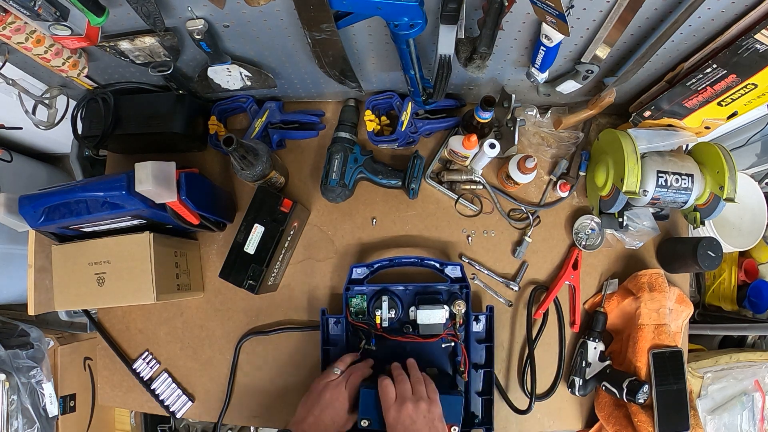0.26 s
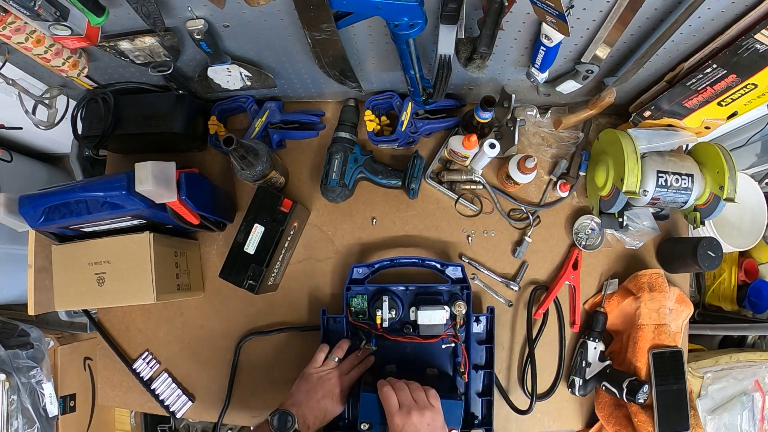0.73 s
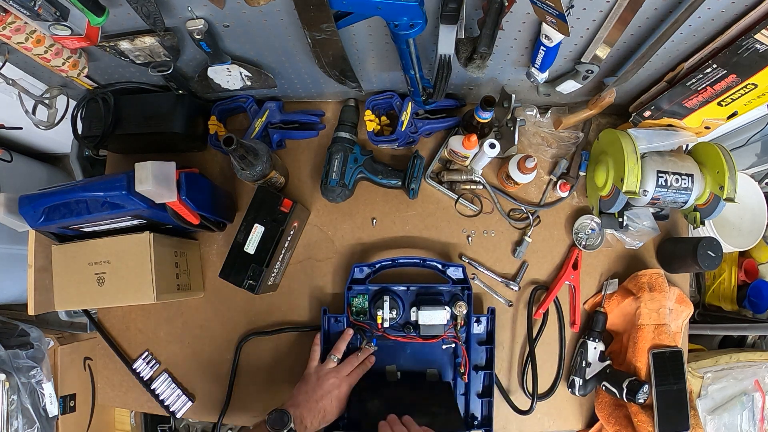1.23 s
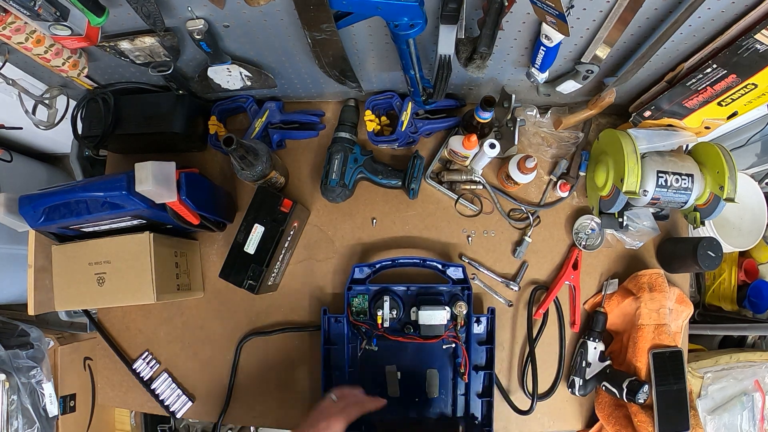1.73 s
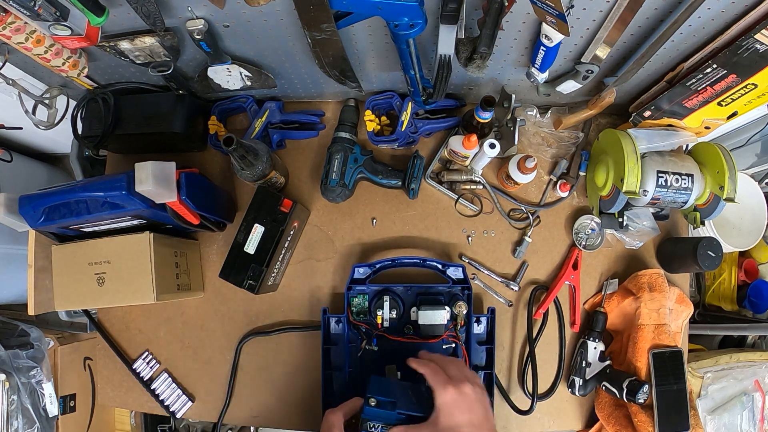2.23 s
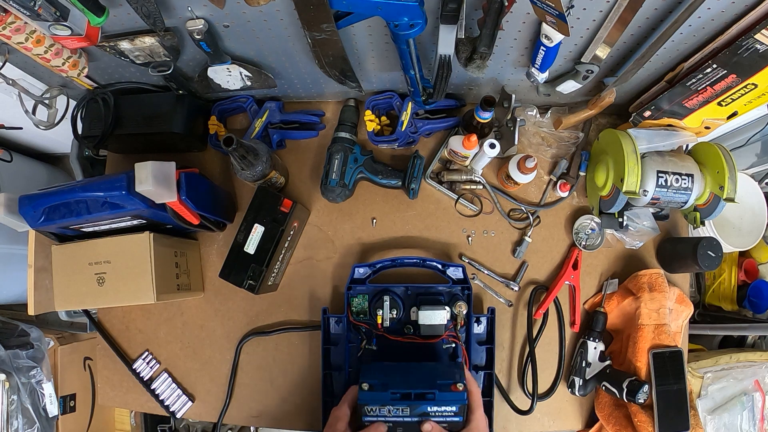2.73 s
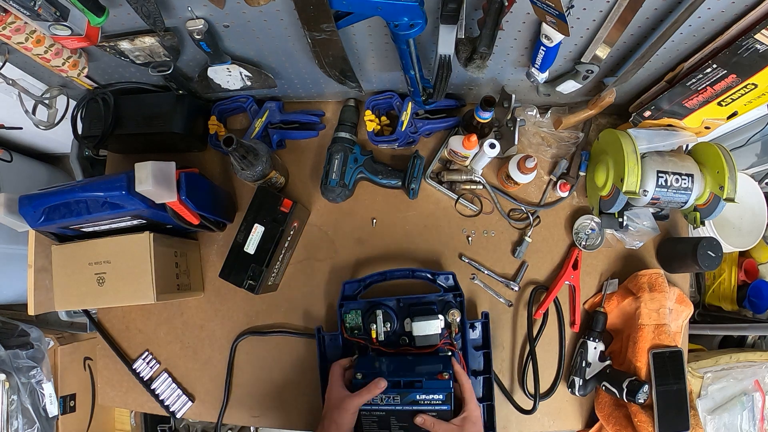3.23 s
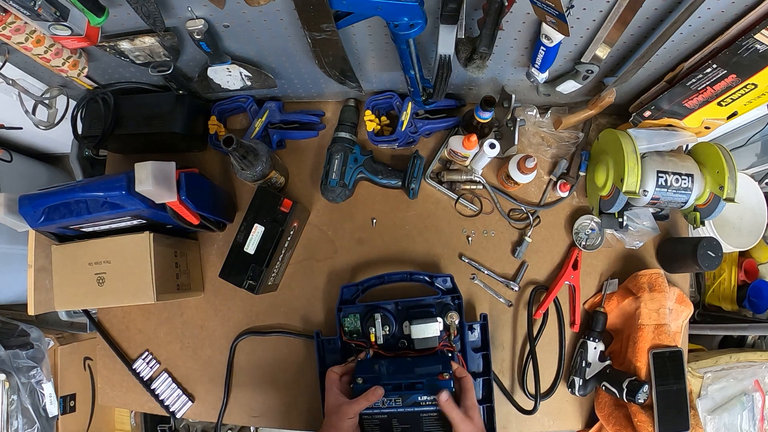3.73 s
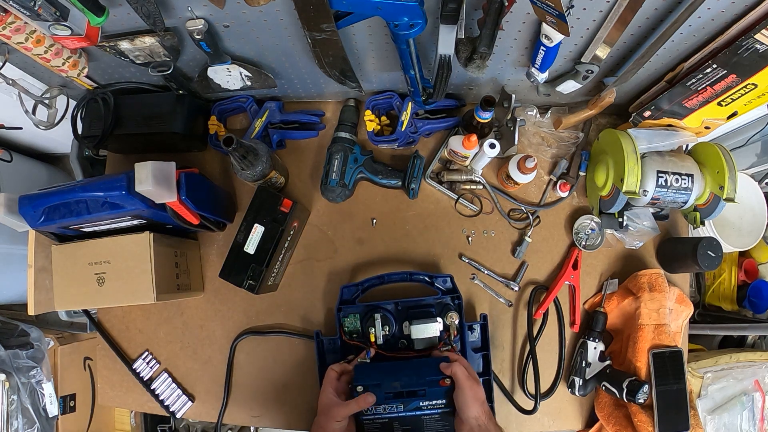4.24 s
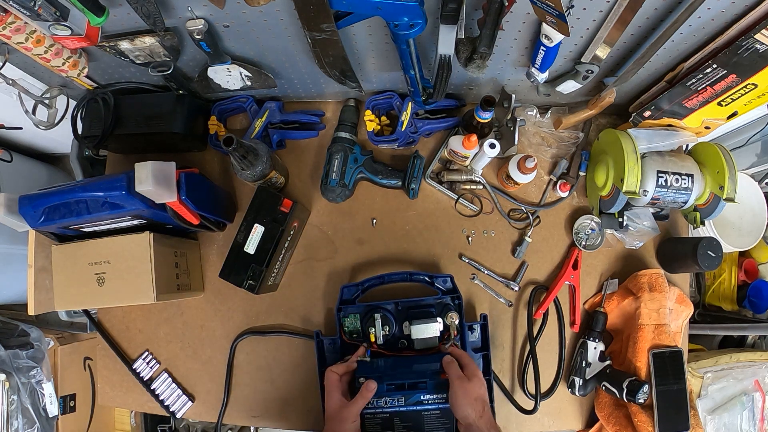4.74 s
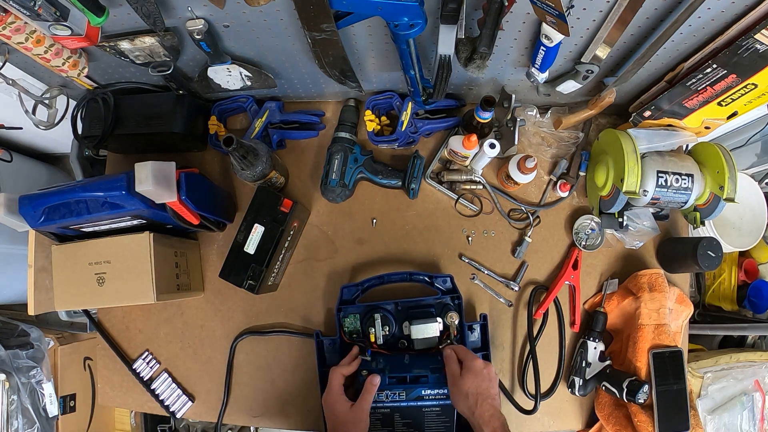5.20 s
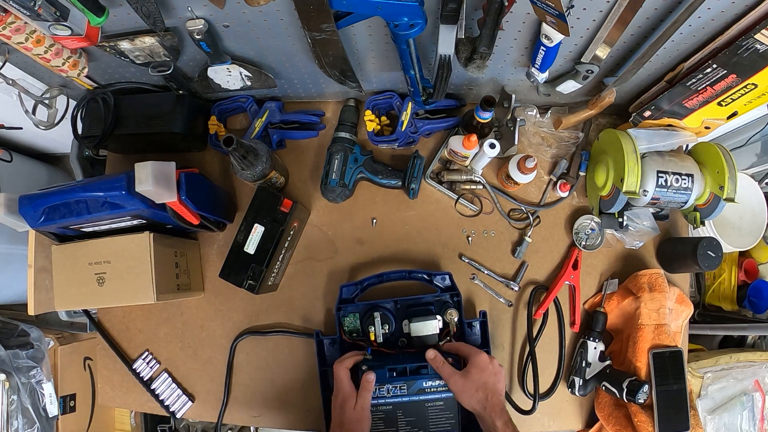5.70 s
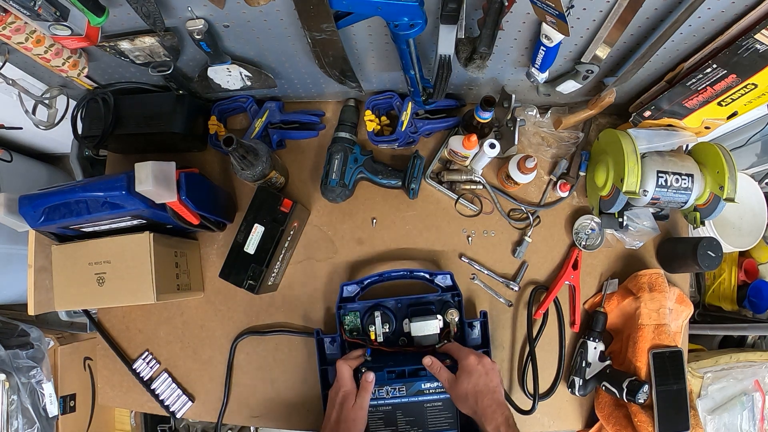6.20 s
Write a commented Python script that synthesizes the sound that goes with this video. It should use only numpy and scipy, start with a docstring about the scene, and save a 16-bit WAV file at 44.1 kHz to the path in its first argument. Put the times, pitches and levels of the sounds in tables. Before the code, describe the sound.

Close plastic handling on a garage workbench: a short scrape, one loud hard clack, a duller double thunk later, then light clicks and scuffs.

```python
"""Hands take a small battery out of a hollow plastic case on a garage workbench, drop it back and push it home.
Its edge scrapes early on; it strikes the case hard just before 1 s and again around 3 s, more softly near 6 s.
Each contact is a burst of noise plus ringing shell tones, and thumps are low swinging tones of the bench.
Throughout, fingers click, rub and slide (filtered noise and tiny slips) over still air, and the garage
answers briefly with fading noise."""
import sys
import numpy as np
from scipy import signal
from scipy.fft import rfft, irfft, next_fast_len
from scipy.io import wavfile
from scipy.ndimage import map_coordinates

SR = 44100
rng = np.random.default_rng(int(sys.argv[2]) if len(sys.argv) > 2 else 0)


def master(y):
    """Save y as 16-bit WAV."""
    cut = np.clip(np.atleast_2d(y).T, -1, 1)
    pcm = np.round(cut * 32767)  # scale
    wavfile.write(sys.argv[1], SR, pcm.astype(np.int16))


N = 284886  # length in samples

# Tone colour of rubbing on the case, for long slides and short strokes: f/Hz, gain/dB
RUB_COLOUR = [(180, -37), (300, 4), (446, -10.5), (581, -4.5), (835, -4.5), (1030, -2), (1540, -5),
              (1730, -2), (1910, -4.5), (2400, -5.5), (3400, -8.5), (5050, -17), (6360, -22.5),
              (9140, -24.5), (15500, -59.5)]


def contacts():
    """Each contact cracks, scatters off the clutter and rings the shell; harder ones sound brighter."""
    # The battery strikes the case: t/s, level/dB, hardness/(dB per octave), extra knock of the hollow/dB,
    # f of the struck wall/Hz, time to fall 60 dB/s
    blow_events = [(0.053, -55.5, -7, 1, 1010, 0.092), (0.651, -46.5, -0.2, 1.5, 1710, 0.12),
                   (0.932, -15, 0.83, 3, 2620, 0.018), (0.952, -22, 0, 4, 3610, 0.015),
                   (0.9643, -22.5, 1, 4.5, 2728, 0.014), (1.078, -46, -2, -2, 2600, .081),
                   (2.089, -60, -0.5, 15.5, 486.6, 0.053), (2.982, -33.5, -6, -2.5, 1606, 0.048),
                   (3.026, -39.5, -3.5, 6.5, 1170, 0.069), (3.056, -43, -7, -9, 1710, 0.062),
                   (3.262, -32.5, -3.5, 2.5, 1250, 0.21), (3.2769, -24, -5.8, -6, 570, 0.029),
                   (3.2806, -27.5, -4.5, -17, 595, 0.082), (3.292, -34, -5, -6.5, 454, 0.18),
                   (3.31, -35, -6.5, -6, 754, 0.072), (4.2369, -43, -4, 3.5, 2070, 0.084),
                   (4.538, -60.5, -9.5, -10.5, 1040, 0.21), (4.84, -40.5, 5.5, -10, 3198, 0.023),
                   (5.267, -49, -4.5, -1, 1750, 0.042), (5.3756, -33, 2.5, 0.5, 3900, 0.082),
                   (5.9198, -46, -4.5, -2.5, 1100, 0.039), (5.964, -34, -2.5, -6, 544, 0.038),
                   (6.4129, -33.5, -5, -3, 1490, 0.043)]
    # Fingers and catches click on the shell: t/s, level/dB, hardness/(dB per octave), f of the wall/Hz
    click_events = [(0.078, -65.5, 6, 4260), (0.148, -49.5, 0, 2440), (0.161, -47, 0, 1730),
                    (0.175, -49.5, 1.5, 2360), (0.772, -57, -0.75, 4440), (1.628, -70.5, 3.5, 3684),
                    (1.678, -72.5, 3.5, 1643), (1.895, -82, 6.5, 8000), (1.968, -72.5, 3.5, 2634),
                    (2.167, -63, 2.5, 4680), (2.246, -54.5, 2.7, 2080), (2.677, -63.5, -2, 802),
                    (2.897, -73.5, 6.5, 3000), (2.955, -58, -4, 3730), (3.474, -43, 0.9, 3170),
                    (3.5308, -43, 0.7, 2590), (3.573, -59.5, 4.5, 3070), (3.598, -45, 1, 3120),
                    (3.615, -49.5, 0, 1970), (3.726, -54, 2, 2340), (3.881, -57.5, -1.5, 2750),
                    (3.914, -54, -4.5, 1690), (3.961, -59, 0, 3260), (4.002, -65, -10.5, 2520),
                    (4.123, -57, -1, 3000), (4.204, -52.5, -3.5, 1080), (4.228, -47.5, -3.3, 1060),
                    (4.362, -66, 4, 2970), (4.434, -55, 1.5, 2780), (4.507, -58, -6.5, 1025),
                    (4.739, -49, -1.5, 2740), (4.879, -46.5, -1, 1075), (4.954, -59, -0.5, 2570),
                    (5.111, -57.5, -4, 963), (5.153, -52, 0.3, 1190), (5.366, -43.5, 4, 4100),
                    (5.586, -65.5, 5.5, 4530), (5.685, -58.5, -0.5, 660), (5.771, -53, -4.5, 1170),
                    (5.893, -49.5, -1.5, 4630), (6.045, -51, -0.9, 1200), (6.107, -55.5, .5, 1210),
                    (6.147, -57.5, -1.5, 1170)]
    # Tones of the hollow case: f/Hz, relative level/dB, time to fall 60 dB/s
    shell_modes = [(149, 1, 0.18), (216, -0.5, 0.27), (237.2, 1.5, 0.27), (280, -9, 0.049), (354, -5, 0.21),
                   (472, -10.5, 0.29), (581.4, 0, 0.22), (788, -4.5, 0.19), (930, -7, 0.081),
                   (950, -8, 0.2), (1207, -4, 0.12), (1430, -15, 0.021), (1487, -7.5, 0.26),
                   (1770, -4.5, 0.12), (2010, -8.5, 0.058), (2580, -9, .08), (2700, -6, 0.077),
                   (3010, -2.5, 0.052), (3240, -4.5, 0.21), (3470, -7, 0.048), (4330, -12, 0.15),
                   (7060, -19.5, 0.14)]
    # Tone colour of the bare contact: f/Hz, gain/dB
    crack_colour = [(71, -27), (120, -0.5), (240, -3), (469, -14.5), (936, -7), (1060, -16), (1190, -12),
                    (2290, -13.5), (2700, -13.5), (3240, -16), (3580, -19), (4570, -19), (6080, -27),
                    (7160, -27.5), (15500, -67.5)]
    # Knock, clack, click, snap and sizzle: low f/Hz, high f/Hz, time over which its level is set/s
    registers = [(120, 400, .02), (400, 1400, .008), (1400, 4000, .008), (4000, 8500, .008),
                 (8500, 15000, .008)]
    # Level of each of these registers at hardness 0, relative to the contact's level: level/dB
    register_levels = np.array([-7.5, -1, 2.5, -5.5, -20.5])
    pivot_hz = 1330  # hardness tilts the registers about this pitch
    click_knock_db, click_t60 = -5.5, 0.055  # a light click hardly stirs the hollow; its length in s
    ring_db, ring_t60 = -8, 0.04  # ring over the crack for a contact this long in s; briefer ones ring less
    wall_db, wall_q = -2, 7  # struck wall over the crack, and sharpness of its resonance

    t = np.arange(SR // 2) / SR
    onset = slice(round(0.008 * SR))
    clicks = [(s, db, hardness, click_knock_db, wall_hz, click_t60)
              for s, db, hardness, wall_hz in click_events]
    events = list(blow_events) + clicks
    octaves = np.array([np.log2(np.sqrt(lo * hi) / pivot_hz) for lo, hi, _ in registers])
    out = np.zeros((2, N))
    for (s, level_db, hardness, knock_db, wall_hz, t60), tail in zip(events, tails(len(events))):
        direct = amp(-60 * t / t60)
        clutter = amp(-28.5 - 60 * t / 0.15)
        fade = (direct + clutter) * (1 - np.exp(-t / 0.0004))
        crack = colour(fade * rng.standard_normal((2, len(t))), crack_colour)

        # every shell tone gets a random sign and strength
        shape = (2, len(shell_modes))
        strengths = rng.choice([-1, 1], shape) * amp(rng.normal(0, 4.4, shape))
        shell = ring(shell_modes, t, strengths)
        wall = resonate(crack, wall_hz, q=wall_q)

        shell_gain = amp(ring_db) * np.sqrt(t60 / ring_t60)
        blow = crack / np.std(crack[0, onset])
        blow += shell_gain * shell / np.std(shell[0, onset])
        blow += amp(wall_db) * wall / np.std(wall[0, onset])
        blow = in_room(blow, tail, wet_db=-12)

        levels = level_db + register_levels + hardness * octaves
        levels[0] += knock_db
        for (lo, hi, build), db in zip(registers, levels):
            part = band(blow, (lo, hi))
            early = np.std(part[:, :round(build * SR)], axis=1, keepdims=True)
            add(out, s, amp(db) * part / early)
    return out


def thumps():
    """The bench top takes the weight softly and swings in its lowest modes."""
    # Weight on the bench: t/s, peak level before a shared 4.5 dB lift/dB
    thump_events = [(0.075, -42.5), (0.43, -51), (0.646, -38), (0.774, -57), (0.929, -24), (0.965, -29),
                    (2.81, -58.5), (2.986, -25), (3.026, -22), (3.274, -21), (3.425, -37.5), (3.914, -50.5),
                    (4.003, -54.5), (4.299, -53), (4.536, -42.5), (5.703, -43.5), (5.914, -36),
                    (5.964, -25.5), (6.108, -39.5), (6.411, -34.5)]
    # Tones of the bench top: f/Hz, relative level/dB, time to fall 60 dB/s
    bench_modes = [(61.6, 2.5, 0.34), (85, -3.5, 0.29), (44.2, -20, 0.39)]
    t = np.arange(SR * 3 // 4) / SR
    soft_start = 1 - np.exp(-t / 0.0027)
    out = np.zeros((2, N))
    for s, db in thump_events:
        strengths = amp(rng.normal(0, 0.58, (2, len(bench_modes))))
        swing = ring(bench_modes, t, strengths) * soft_start
        add(out, s, amp(db + 4.5) * swing / np.abs(swing).max())
    return out


def scrape():
    """The battery's edge chatters along the wall of its bay and sets two thin ribs singing."""
    # Tone colour of the scraping edge: f/Hz, gain/dB
    edge_colour = [(180, -41), (300, -12.5), (808, -25), (953, -15.5), (1750, -14), (1940, -19.5),
                   (2520, -3.5), (2930, -15), (4490, -18), (5210, -34), (6050, -15.5), (7140, -25),
                   (9760, -33), (14300, -86), (15500, -67)]
    crest_s, crest_db = 0.381, -30
    rise, fall = 602, 560  # dB per s
    ribs_db = -9  # the ribs' song relative to the scrape
    slips = unit(friction(edge_colour, slips_per_s=920, spread_db=10.0, smooth_db=-3.0))
    low_rib = unit(resonate(slips, 2550, q=5))
    high_rib = unit(resonate(slips, 4660, q=8))
    ribs = low_rib + amp(-2.5) * high_rib
    force = amp(crest_db + swell(crest_s, 0, rise, fall))
    return in_room(force * (slips + amp(ribs_db) * ribs), tails(1)[0], wet_db=-11.5)


def scuffs():
    """A finger or a corner slides a short way: slips swell and fade in the wall that is rubbed."""
    # Short strokes: t of the crest/s, level before a shared 3.5 dB cut/dB, half length/s, f of the wall/Hz
    strokes = [(0.156, -50.5, 0.027, 3170), (0.318, -50.5, 0.02, 4220), (0.922, -35.5, 0.0072, 932.5),
               (1.12, -52, 0.049, 3380), (1.389, -58.5, 0.022, 2100), (1.541, -68, .02, 3620),
               (2.22, -59.5, 0.049, 4670), (3.408, -55, 0.01, 1610), (4.115, -67, .012, 1140),
               (4.163, -55, 0.019, 1110), (4.282, -49.5, .018, 990), (4.575, -69, .025, 940),
               (4.968, -54, 0.016, 1156), (5.068, -62.5, 0.014, 1074), (5.24, -57, 0.039, 1010),
               (5.468, -54, 0.025, 3740), (5.82, -55, .018, 2120), (6.14, -50.5, 0.014, 1140)]
    t = np.arange(SR // 4) / SR
    lead = 0.1  # s from the start of a stroke to its crest
    slips = unit(friction(RUB_COLOUR, slips_per_s=990, spread_db=7, smooth_db=5))
    out = np.zeros((2, N))
    for s, db, half, wall_hz in strokes:
        piece = slips[:, max(round((s - lead) * SR), 0):][:, :len(t)]
        wall = unit(resonate(piece, wall_hz, q=3.4))
        broad = unit(band(piece, (700, 11000)))
        bell = np.exp(-0.5 * ((t - lead) / half) ** 2)
        add(out, s - lead, amp(db - 3.5) * (wall + amp(-5.5) * broad) * bell)
    return in_room(out, tails(1)[0], wet_db=-10.5)


def handling():
    """Plastic and skin slide on the case, which groans and rocks the bench."""
    # Tone colour of the rocking bench: f/Hz, gain/dB
    rumble_colour = [(12, -38), (20, -9), (59, -2.5), (72, -3.5), (92, -12), (123, -9.5), (160, -10.5),
                     (210, -42), (350, -120)]
    # Tone colour of the groaning shell: f/Hz, gain/dB
    groan_colour = [(59, -29), (100, -3.5), (129, 3), (171, 4.5), (226, 8), (323, -15), (365, -1.5),
                    (501, -19), (580, -17), (700, -11), (910, -42.5), (1540, -120)]
    stick_db, stick_per_s = 2.5, 47  # the rub catches and frees: typical depth, random points a second

    rumble_db, groan_db, rub_db, hiss_db = effort()
    rumble = unit(colour(rng.standard_normal((2, N)), rumble_colour))
    groan = unit(friction(groan_colour, slips_per_s=43, spread_db=-0.5, smooth_db=2.0))
    rub_slips = friction(RUB_COLOUR, slips_per_s=130, spread_db=1.0, smooth_db=1)
    rub = unit(band(rub_slips, (450, 4200)))
    hiss_slips = friction(RUB_COLOUR, slips_per_s=660, spread_db=-2.0, smooth_db=1)
    hiss = unit(band(hiss_slips, (4200, 13000)))

    sliding = amp(groan_db) * groan
    sliding += amp(rub_db - 2.0 + stick_db * wobble(stick_per_s)) * rub
    sliding += amp(hiss_db + 5.5) * hiss
    return amp(rumble_db) * rumble + in_room(sliding, tails(1)[0], wet_db=-4.0)


def effort():
    """Rumble, groan, rub and hiss in dB before handling() trims them: steady grip or slide, the stronger."""
    # Hands hold the case, before the offsets below: t/s, rub level/dB, bench rumble level/dB
    grip = [(0.0, -61.5, -64), (0.34, -57, -84), (0.55, -63.5, -82), (1.02, -55.5, -42), (1.45, -73.5, -67),
            (1.75, -79.5, -78), (2.2, -69.5, -73), (2.88, -73, -65.5), (3.22, -56, -43.5), (3.38, -48, -49),
            (3.55, -55.5, -59), (3.82, -64.5, -66), (4.0, -60, -63.5), (5.3, -61.5, -63.5),
            (5.58, -66.5, -59.5), (5.95, -58.5, -58.5), (6.28, -67, -59.5), (6.46, -57, -66)]
    # Offsets of the grip: rumble from its curve, then groan, rub and skin hiss from the rub curve: level/dB
    grip_offsets = np.array([-1, -4.5, -2, -21])
    # The battery slides on the case: start t/s, length/s, rub level/dB, load on the bench over the rub/dB,
    # hiss over the rub/dB (rub and hiss are trimmed later in handling())
    slides = [(0.097, 0.069, -55.5, -14, -11), (0.234, 0.31, -64.5, -3, -10.5),
              (0.66, .07, -58.5, 7.5, -9.5), (0.776, 0.23, -75, 14.5, 2), (0.959, 0.098, -44, 5, -26),
              (1.074, 0.047, -50.5, 12, -23), (1.2, 0.16, -69.5, 6, -18.5), (1.358, 0.028, -69, 0.5, -4.5),
              (2.174, 0.094, -68, -3.5, -9.5), (2.33, 0.15, -76, -4, 1.5), (3.025, 0.048, -66, 28.5, -3),
              (3.223, 0.038, -40, -5, -20), (3.247, 0.068, -42.5, 11.5, -18), (3.32, 0.1, -48.5, -4, -19),
              (5.295, 0.12, -63, 13, -15.5), (5.703, 0.13, -57.5, 1, -19.5),
              (5.814, 0.051, -51.5, -4, -15.5), (6.117, 0.025, -61.5, -2, -26.5)]
    attack, release = 352, 219  # dB per s
    groan_over_rub, groan_per_load = 3.5, 0.2  # dB, and dB per dB of load: the shell groans more under load

    rub_db, rumble_db = curves(grip)
    levels = np.array([rumble_db, rub_db, rub_db, rub_db]) + grip_offsets[:, None]
    for start, length, db, load_db, hiss_db in slides:
        tops = db + np.array([load_db, groan_over_rub + groan_per_load * load_db, 0, hiss_db])
        slide = tops[:, None] + swell(start, length, attack, release)
        levels = np.maximum(levels, slide)
    return levels


def still_air():
    """The quiet garage: steady coloured noise, independent in middle and sides."""
    # Tone colour of the still garage: f/Hz, gain/dB
    air_colour = [(15, -22), (25, -3.5), (49, -3), (99, -16.5), (240, 1), (469, -26), (782, -14),
                  (1140, -26), (1380, -12.5), (1750, -23.5), (4040, -22), (10100, -37.5), (15500, -36)]
    air_db = -77
    return amp(air_db) * unit(colour(rng.standard_normal((2, N)), air_colour))


def tails(count):
    """Room answers for middle and sides: noise that dies at its own pace per pitch, energy 1 each."""
    # How long the garage answers: f/Hz, time to fall 60 dB/s
    garage_decay = [(150, 0.14), (400, 0.19), (1500, 0.26), (4000, 0.22), (8000, 0.43), (14000, 0.12)]
    noise = rng.standard_normal((count, 2, SR // 2))
    hz, t, z = signal.stft(noise, SR, nperseg=256)
    fade = amp(-60 * t / along(garage_decay, hz)[:, None])
    tail = signal.istft(z * fade, SR, nperseg=256)[1][..., :SR // 2]
    tail = tail * (1 - np.exp(-(np.arange(SR // 2) / SR / 0.0053) ** 2))  # the answer builds up gently
    return tail / np.linalg.norm(tail, axis=-1, keepdims=True)


def in_room(x, tail, wet_db):
    """Add the garage's answer to the middle signal, in middle and sides."""
    answer = signal.fftconvolve(x[:1], tail, axes=1)[:, :x.shape[1]]
    return x + amp(wet_db) * answer


def friction(spectrum, slips_per_s, spread_db, smooth_db):
    """Rubbing in middle and sides: tiny uneven slips over a smooth rush."""
    starts = rng.random(N) < slips_per_s / SR
    slips = starts * amp(spread_db * rng.standard_normal(N).clip(-2, 2))
    slips = signal.lfilter([1], [1, -np.exp(-1 / (0.0019 * SR))], slips)  # each slip fades in about 2 ms
    grains = unit(slips * rng.standard_normal((2, N)))
    rush = amp(smooth_db) * rng.standard_normal((2, N))
    return colour(grains + rush, spectrum)


def resonate(x, hz, q):
    """One resonance of a plastic wall: it favours sound near its own pitch."""
    return signal.lfilter(*signal.iirpeak(hz, q, SR), x)


def ring(modes, t, gains):
    """Struck material rings in several fading tones, each with its own gain."""
    hz, db, t60 = np.transpose(modes)[:, :, None]
    tones = amp(db - 60 * t / t60) * np.sin(2 * np.pi * hz * t)
    return gains @ tones


def swell(start, length, rise, fall):
    """Attack, hold and release of a force in dB below its top; rise and fall in dB per s."""
    t = np.arange(N) / SR - start
    slopes = np.minimum(rise * t, fall * (length - t))
    return np.maximum(slopes, -120).clip(max=0)


def wobble(rate):
    """Uneven motion: a smooth random curve through this many points a second."""
    knots = rng.standard_normal(int(N * rate / SR) + 4)
    return map_coordinates(knots, [np.arange(N) * rate / SR])


def colour(x, points):
    """Give a sound the gains in points (f/Hz, gain/dB), with no response before its cause."""
    n = x.shape[-1]
    m = 2 * next_fast_len(n // 2 + 2048)
    gain = amp(along(points, np.fft.rfftfreq(m, 1 / SR)))
    # folding the cepstrum (transform of the log gain) forward in time makes the filter causal
    cepstrum = irfft(np.log(gain + 1e-6))
    cepstrum[1:m // 2] *= 2
    cepstrum[m // 2 + 1:] = 0
    return irfft(rfft(x, m) * np.exp(rfft(cepstrum)))[..., :n]


def band(x, edges, order=3):
    """Keep the pitches between two edges in Hz, with no response before its cause."""
    return signal.sosfilt(signal.butter(order, edges, 'bandpass', fs=SR, output='sos'), x)


def amp(db):
    """Turn decibels into a gain."""
    return 10 ** (np.asarray(db) / 20)


def unit(x):
    """Scale to an average (rms) level of 1."""
    return x / np.sqrt(np.mean(x ** 2) + 1e-20)


def along(points, hz):
    """Read a curve of (f/Hz, value) points on a logarithmic pitch axis."""
    f, v = np.transpose(points)
    return np.interp(np.log(hz + 1), np.log(f + 1), v)


def curves(rows):
    """One value per sample for each column after the time."""
    s, *cols = np.transpose(rows)
    return [np.interp(np.arange(N) / SR, s, c) for c in cols]


def add(track, s, sound):
    """Mix a sound into the track at time s in seconds."""
    part = track[..., max(round(s * SR), 0):][..., :sound.shape[-1]]
    part += sound[..., :part.shape[-1]]


def scene():
    """Sum all sources as middle and sides, then form left and right; width and balance vary with pitch."""
    # Stereo width: f/Hz, gain of the sides/dB
    width = [(70, -26.5), (170, -20), (350, -13.5), (700, -3), (1400, -2.5), (2800, -9), (5600, -4),
             (9000, 0), (14000, -0.5)]
    # Stereo balance: f/Hz, left minus right/dB
    balance = [(80, 0.1), (350, -3.5), (1200, 1), (3000, -0.9), (5500, -2.5), (9000, -2.5), (13000, 2)]
    mid, side = contacts() + thumps() + scrape() + scuffs() + handling() + still_air()
    side = colour(side, width)
    lean_db = along(balance, np.fft.rfftfreq(N, 1 / SR))
    left_right = rfft([mid + side, mid - side])
    return irfft(left_right * amp([lean_db / 2, -lean_db / 2]), N)


def record(dry):
    """Clip at full scale, then keep only what lies below the band limit."""
    top_hz = 15750
    m = next_fast_len(N + SR // 2)
    kept = np.fft.rfftfreq(m, 1 / SR) < top_hz
    return irfft(rfft(np.clip(dry, -1, 1), m) * kept, m)[:, :N]


dry = scene()
out = record(dry)
master(out)
```